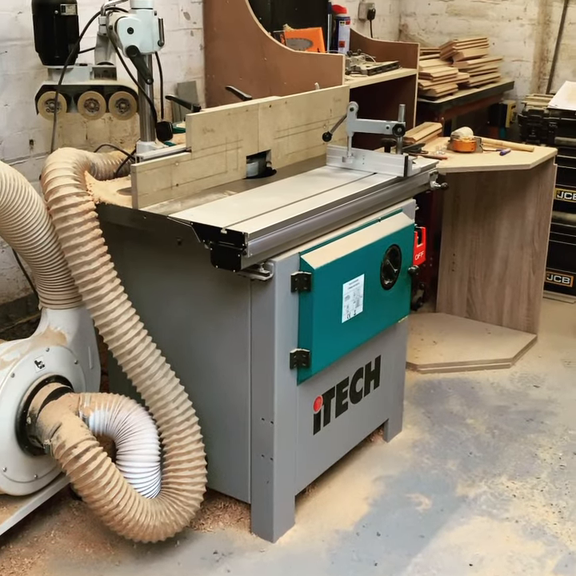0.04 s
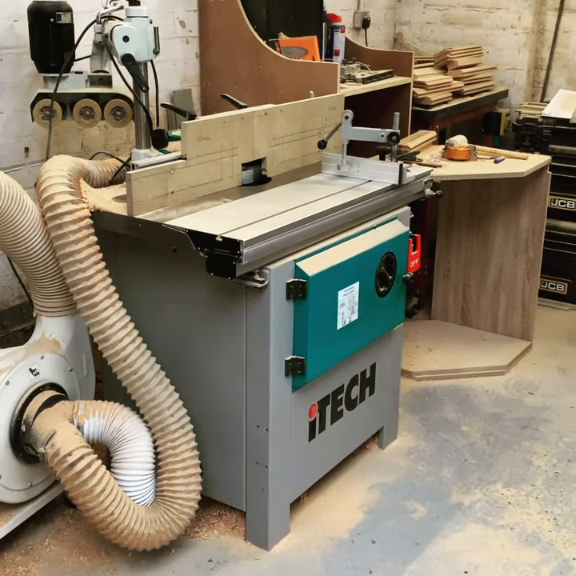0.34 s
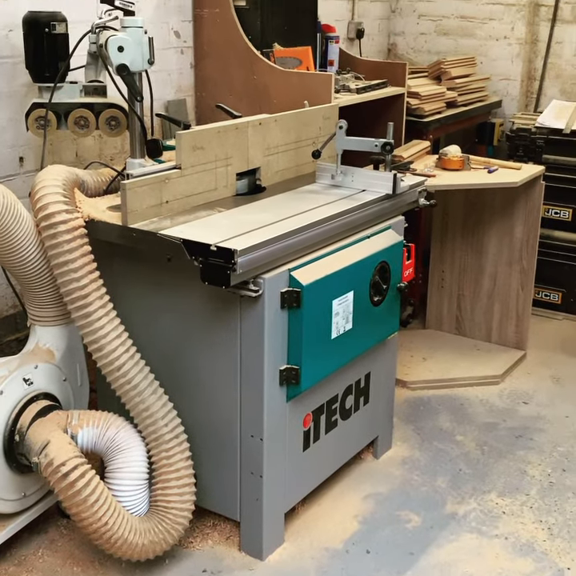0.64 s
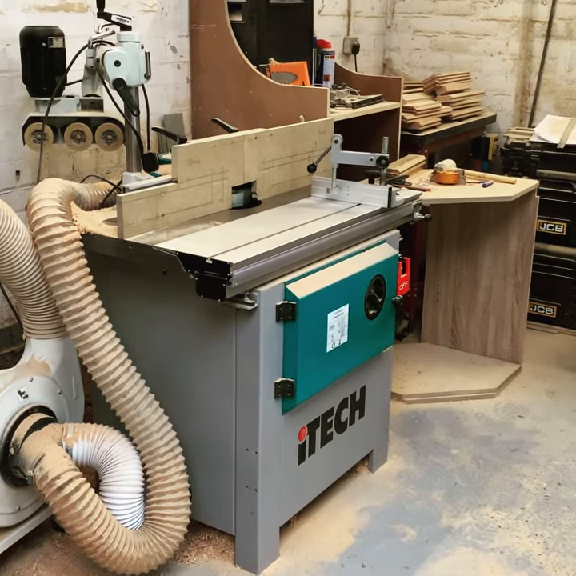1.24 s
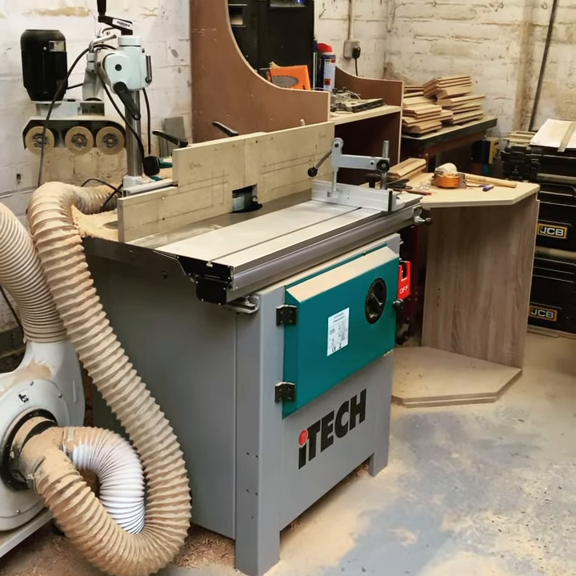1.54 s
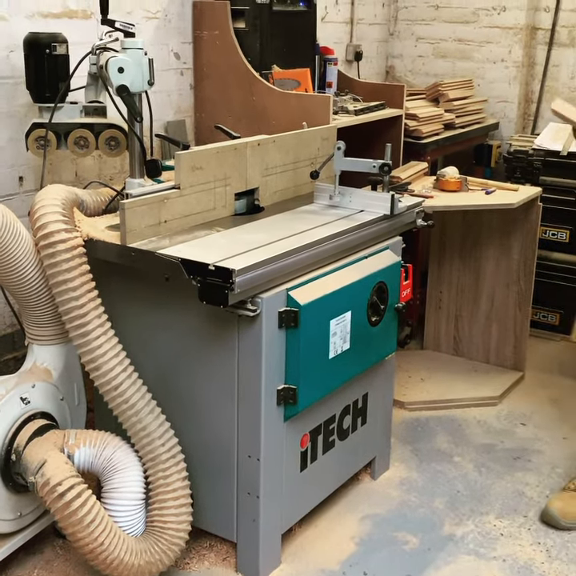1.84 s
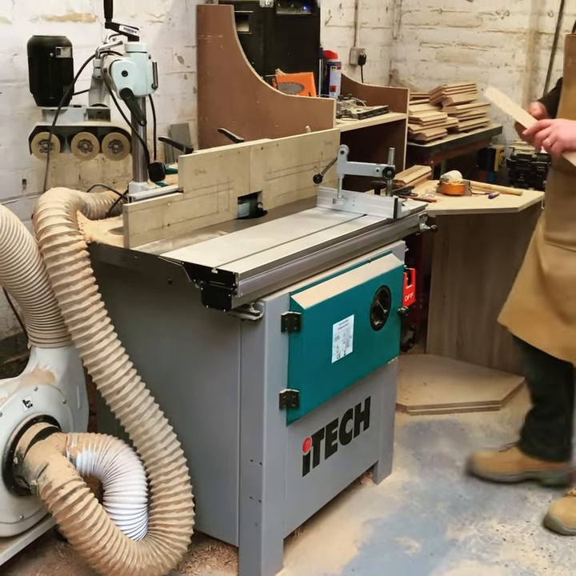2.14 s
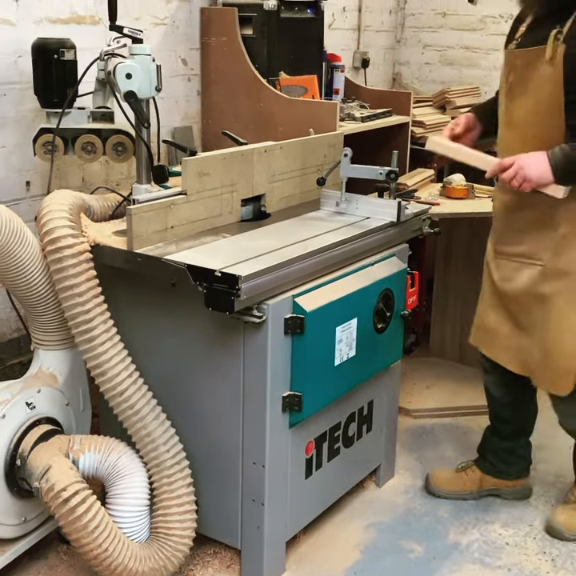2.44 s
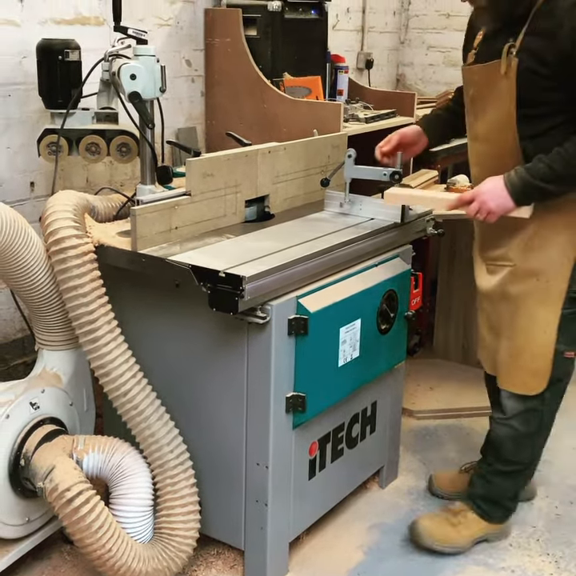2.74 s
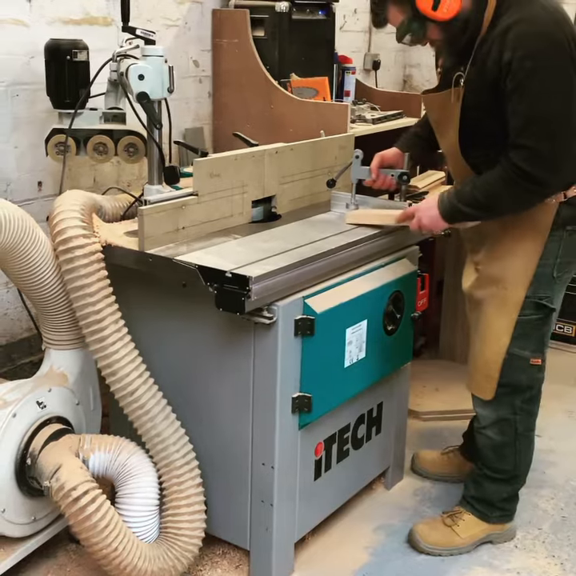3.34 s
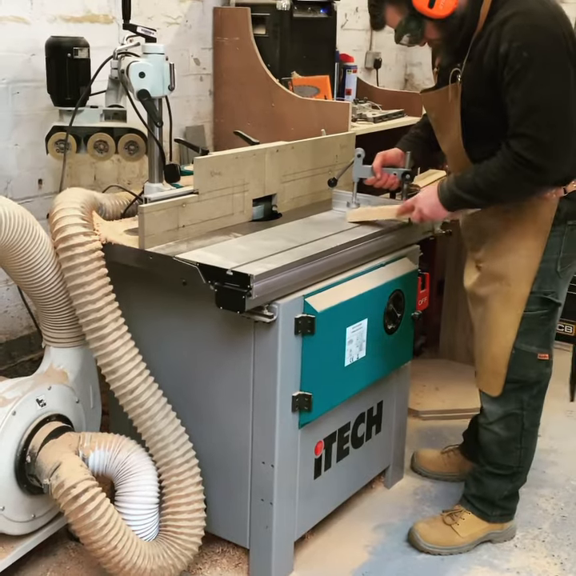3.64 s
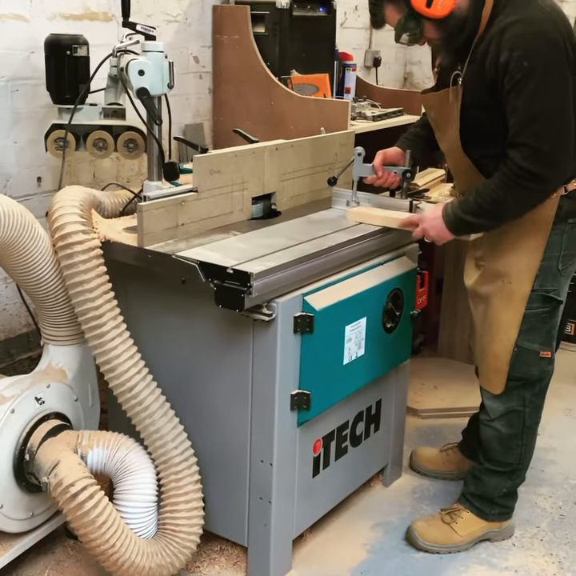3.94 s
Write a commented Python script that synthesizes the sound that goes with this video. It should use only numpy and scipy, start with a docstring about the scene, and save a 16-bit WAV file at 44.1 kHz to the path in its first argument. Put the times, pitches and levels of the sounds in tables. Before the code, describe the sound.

A spindle moulder idles with a steady drone over a dust extractor's roar and low hum. Near the end, timber clatters onto the table and is nudged once, ringing briefly in the workshop. Heard in stereo from one side.

```python
"""A spindle moulder idles in a workshop, its two-knife cutter block droning with each pass of a knife.
A dust extractor roars through its hoses; motor hum and fan tones beat slowly against the drone.
At three seconds a length of timber clatters down on the table, ringing in the room, and is then nudged.
The knock ducks the recorder's gain. Two closely spaced microphones hear it all from one side."""
import sys
import numpy as np
from scipy import signal
from scipy.fft import rfft, irfft
from scipy.io import wavfile
from scipy.ndimage import uniform_filter1d

SR = 44100
rng = np.random.default_rng(int(sys.argv[2]) if len(sys.argv) > 2 else 0)


def wav_out(sig):
    """Save sig, one row per channel (or a flat mono array), as 16-bit PCM at SR to the path in sys.argv[1]."""
    wavfile.write(sys.argv[1], SR, np.round(np.clip(np.atleast_2d(sig).T, -1, 1) * 32767).astype(np.int16))


N = 176400
T = np.arange(N) / SR
FREQS = np.maximum(np.arange(N // 2 + 1) * SR / N, 1)
SPINDLE_HZ, FAN_BLADE_HZ, MAINS_HUM_HZ = 98.277, 295.78, 100.1

# envelope of the knife-pass tone: (time [s], level [dB])
KNIFE_ENVELOPE = [(0.0, -16.5), (0.02, -18), (1.42, -20), (1.47, -22.5), (1.52, -22.5), (1.76, -25.5),
                  (1.82, -19.5), (2.38, -15.5), (2.96, -13.5)]
# envelope of the octave above it: (time [s], level [dB])
KNIFE_OCTAVE_ENVELOPE = [(0.0, -16.5), (0.06, -15.5), (1.01, -17), (1.26, -15), (1.76, -17.5),
                         (2.52, -16.5), (2.96, -14.5)]
# weaker partials of the cutter block: (rough frequency [Hz], level [dB], flutter [dB])
CUTTER_PARTIALS = [(98, -37.5, 1.5), (590, -38, 1.5), (786, -43, 4.5), (983, -32, 1.16), (1179, -55, 0.5),
                   (1376, -42.5, 3.3), (1572, -43, 1.7), (1966, -53, -0.5), (2162, -49, 3),
                   (2359, -49.5, 3), (2555, -56, 3.5), (2948, -51, 0), (3145, -57, 6.5), (3341, -56, 0),
                   (3931, -52, 3), (6320, -59, 2)]
# envelope of the fan's octave: (time [s], level [dB])
FAN_OCTAVE_ENVELOPE = [(0, -36), (.7, -38.5), (1.7, -35), (2.3, -33.5), (2.75, -40.5), (3.3, -32.5),
                       (4, -31)]
# rush of air in hood, hoses and fan: (frequency [Hz], noise density [dB])
AIR_SPECTRUM = [(25, -82), (35, -79), (48, -59), (75, -52), (135, -59.5), (230, -55), (370, -51.5),
                (470, -55.5), (550, -58), (720, -56.5), (930, -57), (1130, -64), (1550, -62.5), (1850, -67),
                (2300, -67.5), (3200, -71), (3620, -68.5), (3950, -70.5), (4250, -68), (4800, -78),
                (5900, -75), (6300, -75), (7300, -78), (8400, -76.5), (10000, -81), (12500, -84.5),
                (15500, -84.5)]
# how much the air flickers: (frequency [Hz], depth [dB])
AIR_FLICKER = [(60, 1.5), (300, 1.05), (1200, 1), (4000, 0.96), (12000, 0.6)]
# tone colour of a contact's dry crack: (frequency [Hz], relative level [dB])
CRACK_SPECTRUM = [(60, -26), (170, 3.5), (520, 11), (900, 2.5), (1300, 1.5), (2500, -5.5), (3600, -10.5),
                  (6400, -12), (8000, -13), (14000, -22)]
# timber hitting the table: (time [s], gain [dB], low-pass cutoff [Hz])
TIMBER_HITS = [(3.0004, -2, 2600), (3.0088, 0, 5460), (3.0165, 0, 7940), (3.024, -2, 9000),
               (3.042, -16, 1500), (3.064, -1.5, 2000), (3.082, -21.5, 2000), (3.858, -6.5, 1600)]
# resonances of timber and table: (frequency [Hz], relative level [dB], T60 [s])
TIMBER_MODES = [(175, -20, .12), (257, -22, 0.054), (447, -13.5, 0.052), (513, -16, .035),
                (658, -16.5, 0.036), (820, -18.5, 0.031), (1030, -17, 0.056), (1203, -18, .03),
                (1346, -16, 0.026), (1570, -24, 0.034), (1880, -17.5, 0.04), (2210, -24, .035),
                (2520, -22.5, .04), (2875, -23.5, 0.032), (3740, -27, 0.033)]
# how alike the microphones hear a diffuse sound: (frequency [Hz], coherence [0-1])
MIC_COHERENCE = [(60, .999), (380, 0.99), (600, 0.44), (900, .62), (1300, .78), (2000, 0.58), (4000, 0.92),
                 (4800, 1), (5800, 0.5), (9000, 1), (15000, .8)]
# stereo balance: (frequency [Hz], left minus right [dB])
MIC_BALANCE = [(60, -0.5), (200, 1.2), (800, 0.66), (1300, 0.5), (2000, -2), (4000, 0.5), (15000, 0)]
# phase between the microphones: (frequency [Hz], lead of the left [rad])
MIC_PHASE_LEAD = [(50, 0), (1800, 0), (2100, .7), (3000, 1.3), (3600, 1.3), (4200, 2.3), (4850, 3.14),
                  (5300, 4.0), (6300, 5.7), (7400, 6.9), (8200, 8.3), (8900, 9.42), (9800, 10.7),
                  (11000, 12.5), (12200, 14.2), (13050, 15.7), (14000, 17.1), (15200, 18.8)]


def from_db(db):
    """Decibels to gain."""
    return 10 ** (np.asarray(db) / 20)


def at_hz(points, hz=FREQS):
    """Read a table on a log-frequency axis."""
    f, value = np.transpose(points)
    return np.interp(np.log(hz), np.log(f), value)


def drift(rate_hz):
    """Smooth random modulation with a spread of 1, mostly slower than rate_hz."""
    slow = irfft(rfft(rng.standard_normal(N)) / (1 + (FREQS / rate_hz) ** 2), N)
    return (slow - slow.mean()) / slow.std()


def low_pass(x, hz, order=2):
    """Butterworth low-pass."""
    return signal.sosfilt(signal.butter(order, hz, fs=SR, output="sos"), x)


def microphones(sound, diffuse=None):
    """Place a sound on the stereo pair; an unrelated diffuse part widens it."""
    sides, pair = np.array([[1], [-1]]), rfft(sound)
    if diffuse is not None:
        alike = at_hz(MIC_COHERENCE)
        pair = np.sqrt((1 + alike) / 2) * pair + np.sqrt((1 - alike) / 2) * rfft(diffuse) * sides
    balance = from_db(sides * at_hz(MIC_BALANCE) / 2)
    right_lag = np.exp(1j * at_hz(MIC_PHASE_LEAD) * np.array([[0], [-1]]))
    return irfft(pair * balance * right_lag, N)


def tone(rms_db, phase):
    """One partial of a train of suction pulses, with its trough at phase zero."""
    return -np.sqrt(2) * from_db(rms_db) * np.cos(phase)


def cutter_block():
    """Two knives pass per turn: two strong tones and a ladder of fluttering spindle harmonics."""
    speed_wander = 0.00017 * drift(1.5)
    angle = 2 * np.pi * SPINDLE_HZ * (T + np.cumsum(speed_wander) / SR)
    out, settled_s = 0, 3.4   # the envelopes hold once the worker stands at the table
    for harmonic, envelope, settled_db in [(2, KNIFE_ENVELOPE, -12.5), (4, KNIFE_OCTAVE_ENVELOPE, -14.5)]:
        db = np.interp(T, *np.transpose(list(envelope) + [(settled_s, settled_db)]))
        out += tone(db + 0.4 * drift(4.7), harmonic * angle)
    for hz, db, flutter_db in CUTTER_PARTIALS:
        harmonic = round(hz / SPINDLE_HZ)
        phase = harmonic * angle + rng.uniform(0, 2 * np.pi) * (harmonic > 7)   # low ones stay aligned
        out += tone(db + flutter_db * drift(9.6), phase + 0.097 * drift(5))
    return microphones(out)


def hum_and_fan():
    """Motor hum and the extractor fan's blade tones lie just beside spindle harmonics and beat with them."""
    out = tone(-40 + 3.3 * drift(2.8), 2 * np.pi * FAN_BLADE_HZ * T)
    hum_db, octave_db = -33, np.interp(T, *np.transpose(FAN_OCTAVE_ENVELOPE))
    for hz, db, beat_crest_s in [(MAINS_HUM_HZ, hum_db, .36), (2 * FAN_BLADE_HZ, octave_db, .165)]:
        beat_hz = hz - SPINDLE_HZ * round(hz / SPINDLE_HZ)
        out += tone(db, 2 * np.pi * (hz * T - beat_hz * beat_crest_s))
    return microphones(out)


def air_rush():
    """Turbulent air in the extractor: each octave flickers by itself and all surge together."""
    noise = rfft(rng.standard_normal((2, N))) * from_db(at_hz(AIR_SPECTRUM)) * np.sqrt(SR / 2)
    octaves = np.round(np.log2(np.maximum(FREQS, 60) / 1000))
    out, surge_db = 0, 0.19 * drift(6.9)
    for octave in np.unique(octaves):
        band = octaves == octave
        flicker_db = at_hz(AIR_FLICKER, FREQS[band].mean()) * drift(14)
        out += irfft(noise * band, N) * from_db(surge_db + flicker_db)
    return microphones(*out)


def wood_mode(click, hz, t60):
    """A unit click sets one resonance ringing as a dying sine."""
    r, w = np.exp(-np.log(1000) / (t60 * SR)), 2 * np.pi * hz / SR
    return signal.lfilter([0, np.sin(w)], [1, -2 * r * np.cos(w), r * r], click + 1e-18)


def timber_knocks(crack_decay_s=0.0048):
    """The plank clatters down and is nudged; each hit is a dry crack plus ringing wood."""
    out, length = np.zeros(N), SR // 2
    age = T[:length]
    click = 1. * (age == 0)
    grit = irfft(rfft(rng.standard_normal(N)) * from_db(at_hz(CRACK_SPECTRUM) - 3), N)
    for time_s, hit_db, cutoff_hz in TIMBER_HITS:
        start = int(time_s * SR)
        hit = np.roll(grit, -start)[:length] * np.exp(-age / crack_decay_s)
        for hz, mode_db, t60 in TIMBER_MODES:
            strength = from_db(mode_db + rng.normal(0, 2.1)) * rng.choice([-1, 1])
            hit += strength * wood_mode(click, hz, t60)
        out[start:start + length] += (from_db(hit_db) * low_pass(hit, cutoff_hz))[:N - start]
    return out


def workshop_reverb(sound, t60=0.75, predelay_s=.012):
    """The walls answer with a diffuse stereo tail, about as strong as the direct sound."""
    age = T[:SR]
    tail = rng.standard_normal((2, SR)) * np.exp(-np.log(1000) * age / t60) * (age > predelay_s)
    tail /= np.sqrt(np.sum(tail[0] ** 2))
    return microphones(*signal.fftconvolve(sound[None], tail)[:, :N])


def scene():
    """A bed of drone, hum and air, with the knocks and their reverb on top."""
    bed = cutter_block() + hum_and_fan() + air_rush()
    knocks = timber_knocks()
    return bed + microphones(knocks) + workshop_reverb(knocks)


def record(dry):
    """A burst of treble ducks the gain, which creeps back; peaks are rounded and the top end is cut."""
    threshold_db, max_cut_db, attack_s, release_db_per_s = -21, 4, 0.015, 0.1
    treble = signal.sosfilt(signal.butter(4, 1100, "high", fs=SR, output="sos"), dry.mean(0))
    treble_db = 10 * np.log10(np.abs(uniform_filter1d(treble ** 2, size=600)) + 1e-12)
    cut_db = np.clip(treble_db - threshold_db, 0, max_cut_db)
    held_db = np.maximum.accumulate(cut_db + release_db_per_s * T) - release_db_per_s * T
    ducked = dry * from_db(-low_pass(held_db, 1 / (2 * np.pi * attack_s), order=1))
    soft_clipped = ducked / (1 + np.abs(ducked / .97) ** 8) ** (1 / 8)
    return signal.sosfilt(signal.ellip(10, .1, 90, 15800, fs=SR, output="sos"), soft_clipped)


dry = scene()
out = record(dry)
wav_out(out)
```